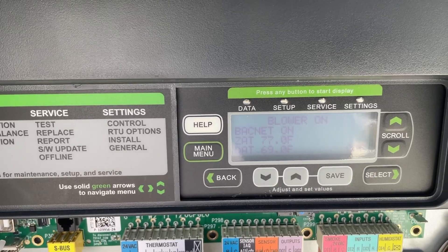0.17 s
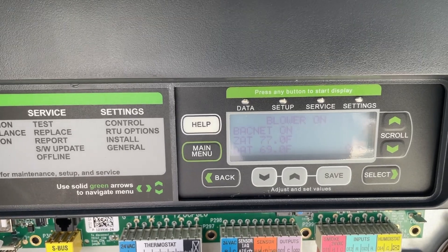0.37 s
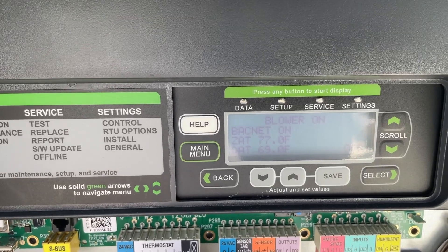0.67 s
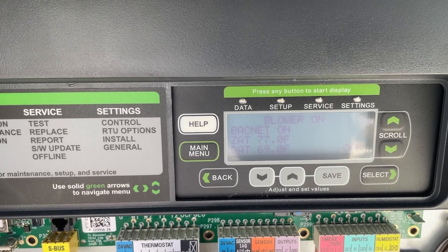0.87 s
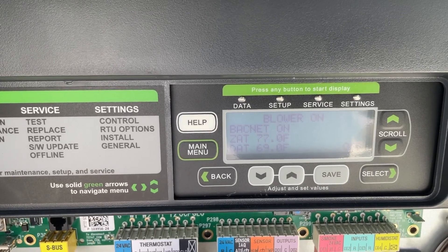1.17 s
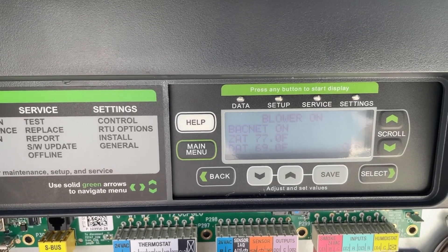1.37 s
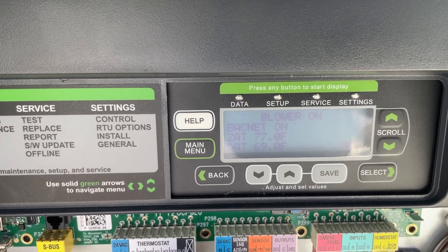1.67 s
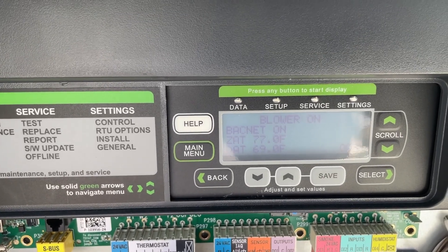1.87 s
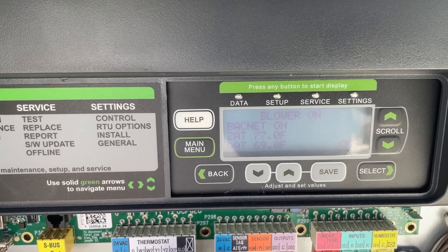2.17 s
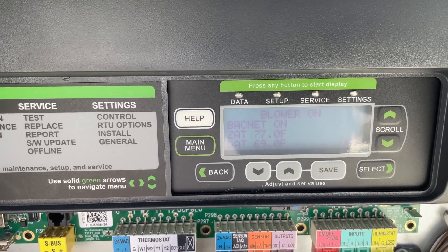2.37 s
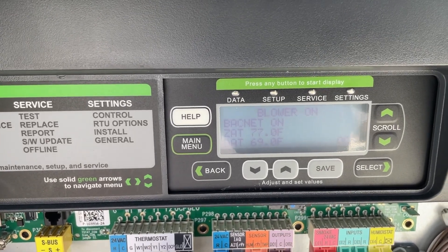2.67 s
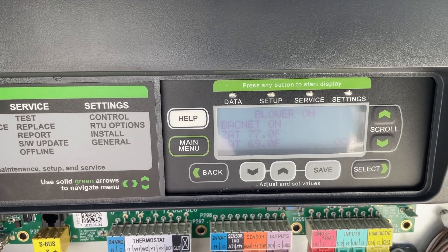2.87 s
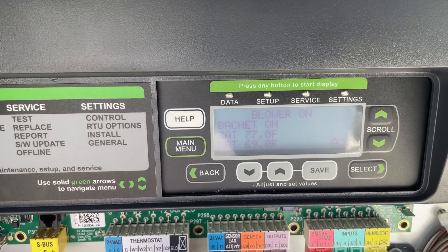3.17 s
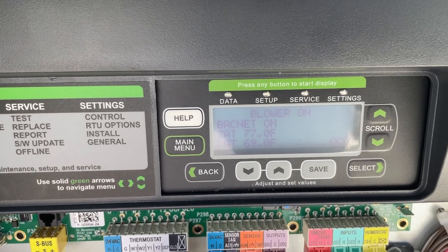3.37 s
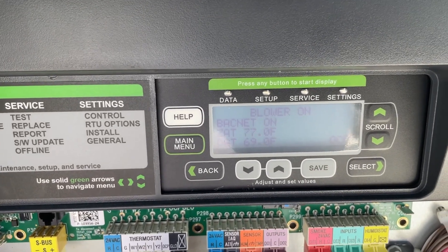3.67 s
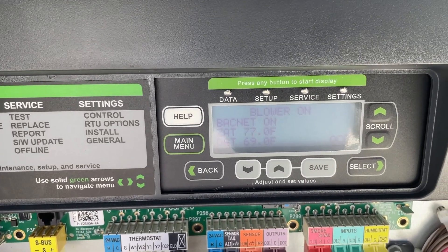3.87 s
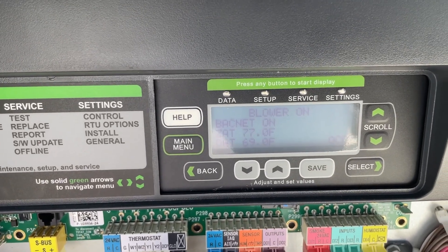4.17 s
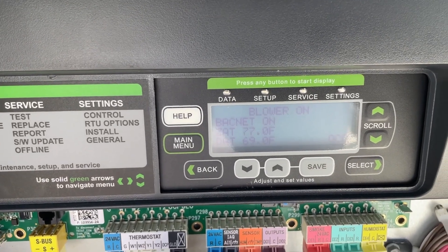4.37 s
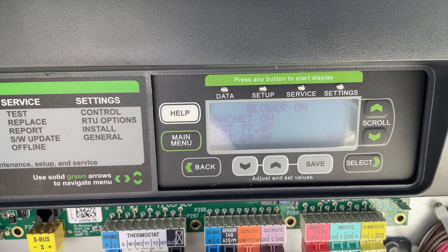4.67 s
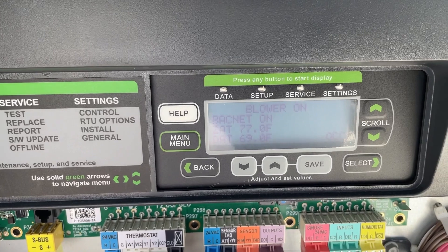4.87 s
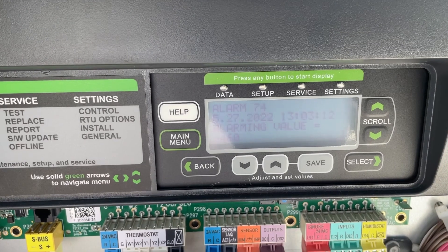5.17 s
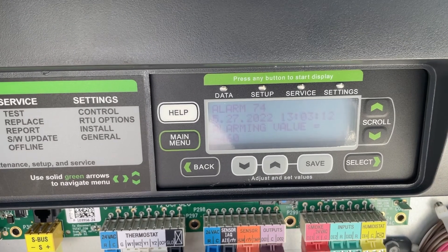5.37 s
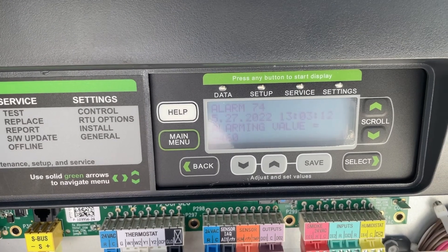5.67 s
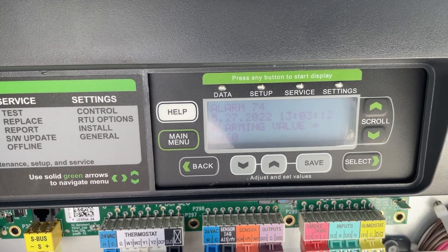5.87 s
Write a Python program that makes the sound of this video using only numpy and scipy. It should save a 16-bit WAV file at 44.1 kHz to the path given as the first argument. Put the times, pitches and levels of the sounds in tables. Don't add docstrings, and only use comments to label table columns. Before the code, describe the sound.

Close at the open control panel of an outdoor rooftop air unit, a blower rumbles deep and even in its metal cabinet. A low electrical hum and a steady thin whine sit on top, with airy rushing and a faint breathy whistle that flutters in small swells. Soft fine hiss lies behind. A single small plastic tick comes about two thirds through; the machine never changes speed.

```python
import sys
import numpy as np
from scipy import signal
from scipy.fft import rfft, irfft, next_fast_len
from scipy.io import wavfile
from scipy.ndimage import uniform_filter1d, map_coordinates

SR = 44100
rng = np.random.default_rng(int(sys.argv[2]) if len(sys.argv) > 2 else 0)


def unload_wav(signal):
    wavfile.write(
        sys.argv[1],
        SR,
        np.round(np.clip(np.atleast_2d(signal).T, -1, 1) * 32767).astype(np.int16),
    )


def volts_from_decibels(level):
    exponent = np.asarray(level, float) / 20
    return 10 ** exponent


N = 265702


def unit(x):
    return x / np.sqrt(np.mean(x ** 2) + 1e-20)


def wobble(rate):
    knots = rng.standard_normal(int(N * rate / SR) + 4)
    return map_coordinates(knots, [np.arange(N) * rate / SR])


def spectrum_hz():
    return np.fft.rfftfreq(2 * next_fast_len(N // 2 + 4096), 1 / SR)


def at_ports(hz, gain, balance_db, alike, lead):
    shared, own = rfft(rng.standard_normal((2, 2 * len(hz) - 2))) * gain
    turn = np.arccos(np.clip(alike, 0, 1)) / 2
    half = volts_from_decibels(balance_db / 2) * np.exp(.5j * lead)
    left = (np.cos(turn) * shared + np.sin(turn) * own) * half
    right = (np.cos(turn) * shared - np.sin(turn) * own) / half
    return unit(irfft([left, right])[:, :N])


def air(colour):
    # f/Hz, width/Hz, boost/dB
    cabinet_modes = [(95, 3.5, 4), (116, 3, 5), (142, 6, 2.5), (183, 3.5, 5), (204, 3, 5), (282, 18, 3),
                     (372, 8, 2), (568, 8, 2.5), (1735, 22, 5.5)]
    hz = spectrum_hz()
    f, *columns = np.transpose(colour)
    db, balance_db, alike, lead = [np.interp(np.log(hz + 1), np.log(f), c) for c in columns]
    for centre, spread, boost in cabinet_modes:
        db = db + boost * np.exp(-((hz - centre) / spread) ** 2)
    inside = (hz > f[0]) * (hz < f[-1])
    return at_ports(hz, volts_from_decibels(db) * inside, balance_db, alike, lead)


def driven(x, level_db, window):
    power = np.mean(x ** 2, axis=0)
    for _ in range(2):
        power = uniform_filter1d(power, int(window * SR))
    return unit(x / np.sqrt(np.abs(power) + 1e-9)) * volts_from_decibels(level_db)


def flow():
    # t/s, lift/dB, length/s
    eddies = [(.1, 4, .12), (.4, 3, 0.071), (.9, 4.5, .25), (1.4, 0.5, .15), (1.93, 4, 0.2),
              (2.24, 4, 0.069), (2.65, 6.5, 0.038), (3.1, 0, .12), (3.74, 6, 0.091), (4.2, 2.5, 0.24),
              (4.4, 1.5, .1), (4.75, 6, 0.048), (5.2, -2, .15), (5.57, 6, 0.053)]
    t = np.arange(N) / SR
    eddy_db = sum(lift_db * np.exp(-((t - s) / length) ** 2) for s, lift_db, length in eddies)
    return eddy_db, 1.1 * wobble(15)


def cabinet_rumble():
    # f/Hz, density/dB per Hz, left-right/dB, likeness/0-1, left lead/rad
    rumble_colour = [(24.0, -71.0, 0.0, 0.91, -0.1), (42.0, -58.5, -0.5, 0.98, -0.1),
                     (59.0, -49.0, -1.5, 0.97, -0.1), (76.0, -49.0, -1.0, 0.97, -0.1),
                     (96.0, -45.5, -1.0, 0.98, -0.1), (108.0, -47.0, -1.0, 0.96, -0.1),
                     (140.0, -46.0, 0.5, 0.97, -0.0), (165.0, -49.0, 1.0, 0.95, 0.1),
                     (190.0, -50.0, 1.5, 0.91, 0.0), (255.0, -57.0, 3.0, 0.75, 0.0),
                     (310.0, -58.5, 4.5, 0.39, 0.9), (365.0, -59.5, -2.5, 0.52, 0.7),
                     (450.0, -64.5, 0.0, 0.58, 0.0), (560.0, -90.0, 0.0, 0.5, 0.0)]
    return driven(air(rumble_colour), -24.5, window=0.36)


def casing_rush(eddy_db, flutter_db):
    # f/Hz, density/dB per Hz, left-right/dB, likeness/0-1, left lead/rad
    rush_colour = [(400.0, -90.0, 0.0, 0.5, 0.0), (480.0, -65.0, 2.0, 0.46, 0.2),
                   (560.0, -66.0, 4.5, 0.31, 1.8), (630.0, -66.5, 1.0, 0.3, 0.6),
                   (700.0, -65.5, -3.5, 0.39, -0.2), (780.0, -70.0, 1.0, 0.63, 1.9),
                   (900.0, -67.5, 2.0, 0.77, 0.8), (1000.0, -67.5, 2.5, 0.81, 1.4),
                   (1160.0, -63.5, 2.0, 0.9, 1.2), (1320.0, -65.5, 0.0, 0.78, 1.6),
                   (1410.0, -63.0, 1.0, 0.84, 2.1), (1560.0, -67.5, 6.0, 0.68, 1.4),
                   (1710.0, -70.0, 2.5, 0.57, 2.1), (1800.0, -88.0, 0.0, 0.3, 1.9)]
    return driven(air(rush_colour), -35 + 0.2 * eddy_db + flutter_db, window=0.23)


def cavity_whistle(eddy_db, flutter_db):
    # f/Hz, width/Hz, left-right/dB, likeness/0-1, left lead/rad
    cavity_tone = (1852, 68, -2.5, .93, -.2)
    hz = spectrum_hz()
    centre, spread, *image = cavity_tone
    whistle = at_ports(hz, np.exp(-((hz - centre) / spread) ** 2), *image)
    return driven(whistle, -49 + eddy_db + 0.9 * flutter_db, window=0.15)


def motor():
    # level/dB, left-right/dB, left lead/rad
    hum_lines = [
        (-40, -3.5, 0.14),
        (-29, 0, 0.03),
        (-49, 10, -.1),
        (-40, -6, -0.15),
        (-56, 2, -.6),
    ]
    whine_lines = [
        (-55.5, -10.5, -1.1),
        (-58, 8, 0.37),
        (-35.4, -1.6, 1.7),
        (-61, 5, 0.64),
    ]
    flutter_lines = [
        (-56.5, -2, 0.23),
        (-62.5, 9, 0.98),
        (-51, 0, 1.1),
        (-61.5, 12.5, 0.87),
        (-57, -4, -1.2),
        (-60, -15, -0.18),
        (-62.5, -1, -.3),
    ]
    mains_hz, shaft_hz, belt_hz, slots = 59.96, 29.386, 11.6, 32
    pull, slot = 2 * mains_hz, slots * shaft_hz
    hum = [mains_hz * k for k in (1, 2, 4, 6, 12)]
    whine = [slot + pull * k for k in (-2, 0, 1, 2)]
    main = whine[2]
    flutter = [main - belt_hz, main + belt_hz, main + 2 * belt_hz, main + shaft_hz]
    flutter += [hum[4] - 3 * belt_hz, hum[4] - 9 / 4 * belt_hz, 23 * shaft_hz]
    lines = hum_lines + whine_lines + flutter_lines
    t, out = np.arange(N) / SR, np.zeros((2, N))
    for hz, (db, balance_db, lead) in zip(hum + whine + flutter, lines):
        phase = 2 * np.pi * (hz * t + rng.random()) + 0.08 * wobble(3)
        peak = np.sqrt(2) * volts_from_decibels(db + 0.5 * wobble(4))
        balance = volts_from_decibels([[balance_db / 2], [-balance_db / 2]])
        out += peak * balance * np.sin(phase + [[lead / 2], [-lead / 2]])
    return out


def tick():
    # t/s, level/dB, f/Hz, length/s, left-right/dB
    scuffs = [
        (4.086, -55.5, 10800, .015, 0),
        (4.0865, -62, 13000, .013, 0),
        (4.0925, -42.5, 4500, .007, 1.5),
        (4.092, -54, 5700, .006, 1.5),
        (4.291, -65, 11500, .02, 0),
    ]
    out, t = np.zeros((2, N)), np.arange(SR // 20) / SR
    for s, db, hz, length, balance_db in scuffs:
        band = signal.butter(2, [hz * .85, hz * 1.17], "bandpass", fs=SR, output="sos")
        shared, *own = rng.standard_normal((3, len(t)))
        burst = unit(signal.sosfilt(band, shared + .8 * np.array(own)))
        shape = (1 - np.exp(-t / 0.00072)) * np.exp(-(t / length) ** 2)
        gain = volts_from_decibels([[db + balance_db / 2], [db - balance_db / 2]])
        out[:, round(s * SR):][:, :len(t)] += gain * shape * burst
    return out


def far_hiss():
    # f/Hz, density/dB per Hz, left-right/dB, likeness/0-1, left lead/rad
    far_hiss_colour = [(1850.0, -100.0, 0.0, 0.6, -0.3), (1960.0, -78.5, -1.0, 0.79, -0.3),
                       (2030.0, -81.0, -0.5, 0.6, -0.5), (2125.0, -77.0, 1.5, 0.59, -1.3),
                       (2300.0, -81.5, 3.0, 0.63, 0.4), (2450.0, -82.0, 5.0, 0.38, -0.5),
                       (2610.0, -85.0, 4.5, 0.43, 0.7), (2700.0, -85.0, 7.0, 0.46, 0.7),
                       (2820.0, -86.5, 2.5, 0.57, 0.8), (2930.0, -84.5, 6.0, 0.57, 0.5),
                       (3200.0, -88.5, 3.5, 0.43, 0.4), (3700.0, -91.0, 3.0, 0.62, 0.7),
                       (4050.0, -91.5, 3.5, 0.67, 0.2),
                       (4500.0, -93.0, 4.5, 0.5, 0.0), (5200.0, -92.5, 2.5, 0.7, 0.3),
                   (5700.0, -95.5, 2.0, 0.64, -0.4), (6330.0, -96.0, 1.5, 0.72, -0.4),
                   (6800.0, -98.0, 1.5, 0.47, -1.3), (7300.0, -96.0, 1.0, 0.75, -2.1),
                   (8200.0, -99.0, 0.0, 0.8, -3.1), (9300.0, -101.0, 0.0, 0.6, -4.0),
                   (10100.0, -103.0, 0.0, 0.55, -5.2), (11500.0, -105.0, 0.0, 0.8, -6.3),
                   (13200.0, -110.0, 0.0, 0.6, -8.0), (14400.0, -110.5, 0.0, 0.8, -9.4),
                   (15800.0, -116.0, 0.0, 0.8, -9.4)]
    return air(far_hiss_colour) * volts_from_decibels(-49.5 + 0.55 * wobble(5))


def scene():
    eddy_db, flutter_db = flow()
    blower = cabinet_rumble() + casing_rush(eddy_db, flutter_db) + cavity_whistle(eddy_db, flutter_db)
    return blower + motor() + tick() + far_hiss()


def band_limit(x):
    return signal.sosfilt(signal.butter(12, 15720, fs=SR, output="sos"), x)


def record(dry):
    to_end = np.minimum(np.arange(N), np.arange(N)[::-1]) / (.002 * SR)
    edge = np.sin(np.pi / 2 * np.clip(to_end, 0, 1)) ** 2
    return band_limit(edge * dry)


dry = scene()
out = record(dry)
unload_wav(out)
```